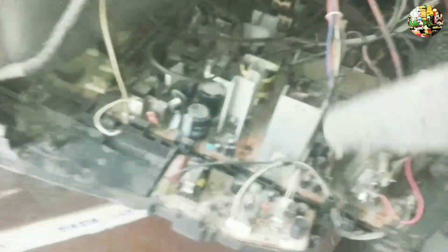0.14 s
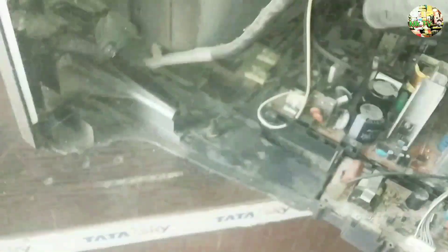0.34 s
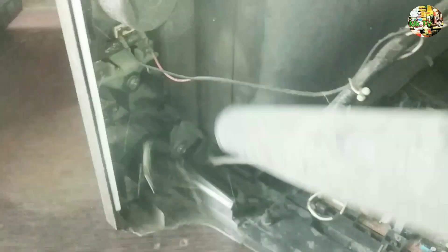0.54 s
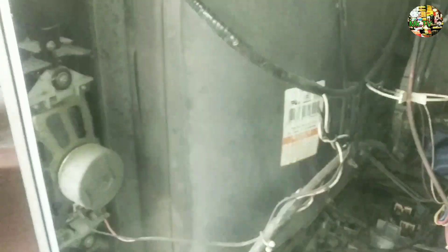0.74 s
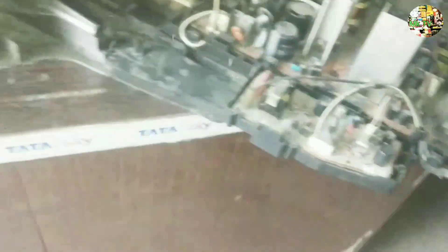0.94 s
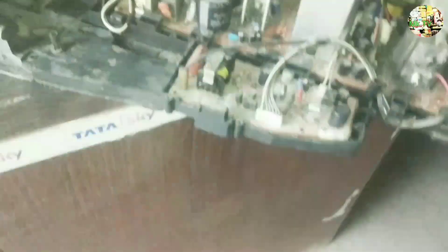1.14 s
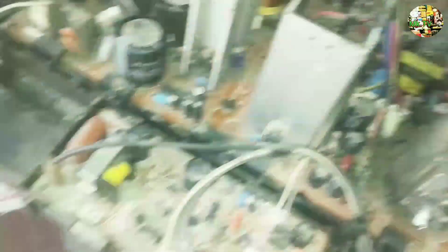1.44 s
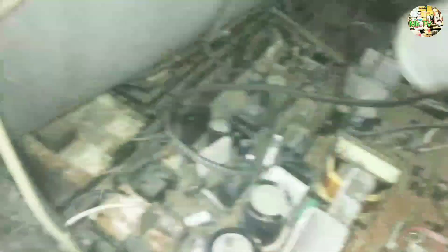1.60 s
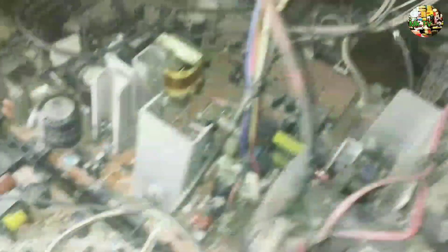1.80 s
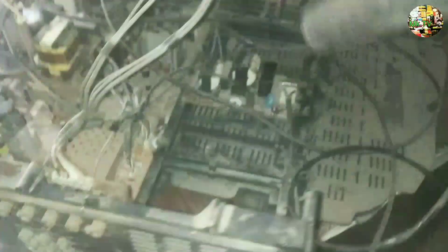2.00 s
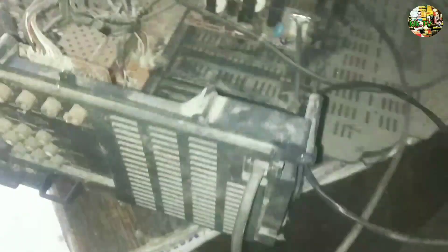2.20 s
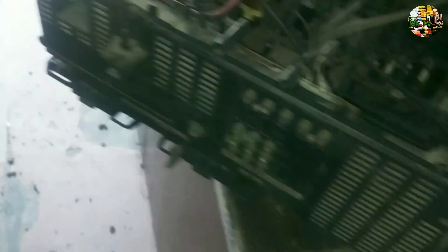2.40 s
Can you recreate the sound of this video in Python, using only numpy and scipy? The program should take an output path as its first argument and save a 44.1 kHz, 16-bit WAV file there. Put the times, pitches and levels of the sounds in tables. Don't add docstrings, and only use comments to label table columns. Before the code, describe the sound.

Hand-held electric blower roars and whines over a dusty circuit board, its motor sagging several times

```python
import sys
import numpy as np
from scipy import signal
from scipy.fft import rfft, irfft
from scipy.io import wavfile
from scipy.ndimage import uniform_filter1d

SR = 44100
rng = np.random.default_rng(int(sys.argv[2]) if len(sys.argv) > 2 else 0)


def ratio_of_db(decibels):
    return 10 ** (np.asarray(decibels, float) / 20)


def persist_wave(psi):
    counts = np.round(np.clip(psi, -1, 1) * 32767).astype(np.int16)
    wavfile.write(sys.argv[1], SR, np.atleast_2d(counts).T)


N = 112454

SLICE, FIRST_JOINT = 660, 330
FADE, JOINT_SCATTER = .5, .24
COUNT = N // SLICE + 3
MIDS = (FIRST_JOINT + (np.arange(COUNT) - 1.5) * SLICE) / SR  # s, middle of each slice
LOCAL = (np.arange(2 * SLICE) - SLICE) / SR  # s, time about the middle
HZ = np.fft.rfftfreq(2 * SLICE, 1 / SR)
SHIFTS = JOINT_SCATTER * rng.uniform(-1, 1, (COUNT + 1, 1))


def along(points, hz):
    f, v = np.transpose(points)
    return np.interp(np.log(hz + 1), np.log(f + 1), v)


def per_slice(rows):
    s, *cols = np.transpose(rows)
    return [np.interp(MIDS, s, c)[:, None] for c in cols]


def bumps(s, long_s):
    return np.exp(-.5 * ((MIDS - s) / long_s) ** 2)[:, None]


def scatter_per_slice():
    return rng.standard_normal((COUNT, 1))


def drift(size):
    return uniform_filter1d(scatter_per_slice(), size=size, axis=0) * np.sqrt(size)


def join(rows, alike):
    place = LOCAL * SR / SLICE
    rise = place + .5 - SHIFTS[:-1]
    fall = .5 + SHIFTS[1:] - place
    ramp = np.clip(.5 + np.minimum(rise, fall) / FADE, 0, 1)
    rows = rows * (ramp if alike else np.sin(np.pi / 2 * ramp))
    whole = rows[1:, :SLICE] + rows[:-1, SLICE:]
    return whole.ravel()[2 * SLICE - SLICE // 2 - FIRST_JOINT:][:N]


def filtered_noise(gain):
    return irfft(rfft(rng.standard_normal((COUNT, 2 * SLICE))) * gain)


def noise(gain, patchy_db):
    field = rng.standard_normal((COUNT, len(HZ)))
    field = uniform_filter1d(uniform_filter1d(field, size=7, axis=1), size=4, axis=0)
    field = field / field.std()
    hollows_db = 9 * np.clip(-field - 1.2, 0, 2)
    rows = filtered_noise(gain * ratio_of_db(patchy_db * field - hollows_db))
    return rows / rows.std()


# frequency in Hz, level in dB per Hz.
RUMBLE = [(12, -30), (25, -9), (40, -5), (65, 0), (90, -5), (130, -16), (250, -50)]
# time in seconds, length in seconds, level in dB.
THUMPS = [(.01, .01, -41), (.092, .012, -37), (.5, .02, -38), (1.27, .015, -39), (1.4, .02, -30),
          (2.45, .02, -38), (2.53, .015, -36)]


def handling():
    size = ratio_of_db(-46 + 3 * scatter_per_slice())
    for s, long_s, db in THUMPS:
        size = size + ratio_of_db(db) * bumps(s, long_s)
    rumble = noise(ratio_of_db(along(RUMBLE, HZ)), patchy_db=5.5)
    rumble = rumble / rumble.std(axis=1, keepdims=True)
    rustle_colour = [(500, -30), (1800, 4), (5000, -8), (15000, -25)]  # (Hz, dB)
    rustle = noise(ratio_of_db(along(rustle_colour, HZ)), patchy_db=-4)
    rustle = ratio_of_db(-40.5) * bumps(.034, .008) * rustle
    return join(size * rumble + rustle, alike=False)


# time in seconds, length in seconds, level in dB, centre in Hz.
STRIKES = [(.121, 0.0065, -31, 1150), (.122, 0.0066, -22, 2900), (0.551, 0.036, -23, 880),
           (.65, 0.07, -23.5, 1520), (0.786, 0.038, -27.5, 1060), (0.97, 0.03, -27.5, 710),
           (1.146, 0.015, -30, 453), (1.402, 0.018, -23.5, 1399), (2.0, 0.021, -23, 1170),
           (2.247, .015, -27, 695.4), (2.4, 0.017, -23.5, 650)]


def edge_roars():
    q = 1.48
    gain = 0
    for s, long_s, db, hz in STRIKES:
        detuning = q * (HZ / hz - hz / (HZ + 1))
        peak = 1 / np.sqrt(1 + detuning ** 4)
        same_power = 1 / np.sqrt(hz / q / HZ[-1])
        gain = gain + ratio_of_db(db) * bumps(s, long_s) * peak * same_power
    return join(filtered_noise(gain), alike=False)


# frequency at the start in Hz, frequency at the end in Hz, width in Hz, # depth
# in dB, wander as a share of the frequency.
NOTCHES = [(3390, 2920, 247, 12, 0.08), (6020, 7250, 400, 5, 0.023), (6800, 4990, 210, 18, 0.089),
           (10400, 10500, 210, 9, 0.071)]


def jet_notches(blowing):
    notch_db = 0
    for first_hz, last_hz, width_hz, depth_db, wander in NOTCHES:
        centre = np.linspace(first_hz, last_hz, COUNT)[:, None] * (1 + wander * drift(size=4))
        depth = depth_db * np.clip(.33 + 1.2 * drift(size=2), 0, 2) * blowing
        notch_db = notch_db - depth * np.exp(-((HZ - centre) / width_hz) ** 2)
    return notch_db


def treble_ripple():
    period, first = 1024, 733
    since = (np.arange(N) - first + period // 2 + .0006 * SR) % period - period // 2
    dip_db = -8.5 * np.exp(-(since / SR / .0016) ** 2)
    ripple_db = 1.5 * np.cos(2 * np.pi * (4.05 * since / period + .02))
    return ratio_of_db(dip_db - ripple_db)


# time in seconds, level in dB.
JET = [(0, -51.5), (.03, -41), (.06, -49), (.107, -43.5), (.117, -21), (.15, -21), (.27, -20.5), (.55, -20),
       (.61, -21), (.65, -16), (.7, -19.5), (.9, -21.5), (1.17, -18), (1.3, -21), (2.39, -21), (2.44, -25),
       (2.49, -32), (2.55, -32.5)]
# frequency in Hz, level in dB per Hz.
BODY = [(180, -16), (300, -2), (370, -5.5), (662, -5.5), (908, -7.5), (2220, -5.5), (3260, -8.5),
        (4410, -7), (7000, -17), (9100, -15), (15400, -120)]
# frequency in Hz, level in dB per Hz.
HISS = [(4000, -11), (6800, -4.5), (9460, -1.5), (13800, -4), (15400, -12)]


def jet():
    level_db, = per_slice(JET)
    notch_db = jet_notches(level_db > -35)
    under = ratio_of_db(-9.5) * (HZ > 110) * (HZ < 300)
    body = noise((ratio_of_db(along(BODY, HZ)) + under) * ratio_of_db(notch_db), patchy_db=1.5)
    body *= ratio_of_db(1.12 * scatter_per_slice())
    lag_s = .0097
    lag_db = -6.5 * bumps(TRIGGER[0][0] + lag_s, lag_s)
    hiss = noise(ratio_of_db(along(HISS, HZ) + notch_db), patchy_db=2.5)
    hiss *= ratio_of_db(-1 + lag_db + 1.43 * scatter_per_slice())
    rush = join(ratio_of_db(level_db) * body, alike=False) + edge_roars()
    return rush + treble_ripple() * join(ratio_of_db(level_db) * hiss, alike=False)


FULL_HZ = 225.5
# pressed in seconds, released in seconds.
TRIGGER = [
    (.105, .758),
    (.798, 1.88),
    (1.915, 1.962),
    (2.0, 2.218),
    (2.283, 2.378),
]


def shaft_speed():
    warm_sag_hz_per_s, spin_up_s, coast_s = 3.3, .03, .12
    hz, now = np.zeros(COUNT), 0
    full = FULL_HZ - warm_sag_hz_per_s * MIDS
    for (on, off), (again, _) in zip(TRIGGER, TRIGGER[1:] + [(np.inf, 0)]):
        climbing = full + (now - full) * np.exp(-np.abs(MIDS - on) / spin_up_s)
        hz = np.where(MIDS >= on, climbing, hz)
        top = FULL_HZ - warm_sag_hz_per_s * off
        top += (now - top) * np.exp(-(off - on) / spin_up_s)
        hz = np.where(MIDS >= off, top * np.exp(-np.abs(MIDS - off) / coast_s), hz)
        now = top * np.exp(-(again - off) / coast_s)
    return hz[:, None] * (1 + .006 * scatter_per_slice())


# time in seconds, heard pitch in Hz, phase scatter in cycles, level in dB.
HUM = [(.15, 191.6, 0.079, -21.5), (.2, 199.6, 0.15, -14.5), (.26, 223.4, 0.039, -15.5),
       (.6, 215, 0.048, -16.5), (.75, 208.1, 0.087, -15), (.88, 211, 0.25, -15.5), (1.1, 208.9, 0.082, -15),
       (1.25, 201.4, 0.22, -18), (1.42, 204, 0.13, -16), (1.52, 188, 0.24, -15.5), (1.85, 179.8, 0.17, -14),
       (1.95, 197.1, 0.089, -14), (2.05, 199.5, 0.072, -15.5), (2.12, 234.6, 0.052, -14),
       (2.22, 230.8, 0.048, -11.5), (2.32, 181.8, 0.12, -13.5), (2.39, 206, .2, -19),
       (2.45, 193, 0.22, -22)]
# frequency in Hz, gain in dB.
HOUSING = [(60, -40), (140, -18), (165, -9), (182, -5), (197, 0), (230, 0)]
# shaft order, level in dB relative to the hum.
OVERTONES = [(2, -33), (3, -23), (20, -30.5)]


def shaft_hum(hz):
    heard_hz, scatter, level_db = per_slice(HUM)
    slipping = np.cumsum(heard_hz * SLICE / SR + scatter * scatter_per_slice(), axis=0)
    turns = slipping + hz * LOCAL
    hum = np.sin(2 * np.pi * turns)
    for order, db in OVERTONES:
        hum = hum + ratio_of_db(db) * np.sin(2 * np.pi * order * turns)
    return ratio_of_db(level_db + along(HOUSING, hz) + 1.63 * scatter_per_slice()) * hum


FAN_ORDER, BAR_ORDER = 10, 12
# time in seconds, fan level in dB, commutator level in dB.
WHINE = [(.1, -26, -39), (.3, -25, -63), (.59, -23, -26.5), (.64, -33, -44), (.72, -24.5, -31),
         (.8, -29.5, -46), (.85, -21, -35), (1.14, -29.5, -29), (1.221, -31, -30), (1.359, -25.5, -29),
         (1.48, -36, -27.5), (1.651, -23, -29), (1.75, -29, -18), (1.839, -28, -34), (1.949, -25.5, -25.5),
         (2.18, -26.5, -31), (2.39, -29, -29.5), (2.46, -62, -66)]


def whine(hz):
    sag_lift_db = 1.6 * (1 - hz / FULL_HZ) * 10
    slow_db = 80 * np.log10(np.clip(hz / 135, 1e-4, 1))
    rows = 0
    for order, db in zip((FAN_ORDER, BAR_ORDER), per_slice(WHINE)):
        level = ratio_of_db(db + sag_lift_db + slow_db + 3 * scatter_per_slice())
        rows = rows + level * np.sin(2 * np.pi * (order * hz * LOCAL + rng.random((COUNT, 1))))
    return rows


def blade_wash(hz):
    band = np.exp(-((HZ - (FAN_ORDER + .5) * hz) / 510) ** 2)
    level_db = -7.5 + uniform_filter1d(per_slice(WHINE)[0], size=15, axis=0)
    return ratio_of_db(level_db) * noise(band, patchy_db=6.5) * (hz > 0)


def motor():
    hz = shaft_speed()
    return np.sqrt(2) * join(shaft_hum(hz) + whine(hz) + blade_wash(hz), alike=True)


def scene():
    return (handling() + jet() + motor())[None]


def top_cut(x):
    return signal.sosfilt(signal.butter(12, 15500, fs=SR, output="sos"), x)


def record(dry):
    kept = irfft(rfft(dry) * (np.fft.rfftfreq(N, 1 / SR) < 15480), N)
    return top_cut(kept)


dry = scene()
out = record(dry)
persist_wave(out)
```